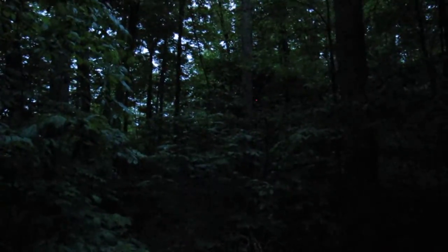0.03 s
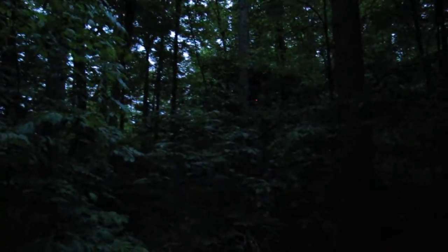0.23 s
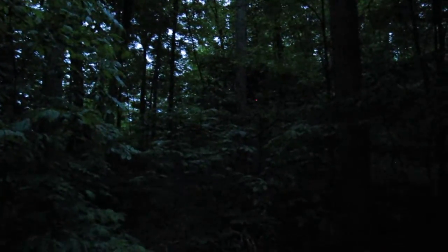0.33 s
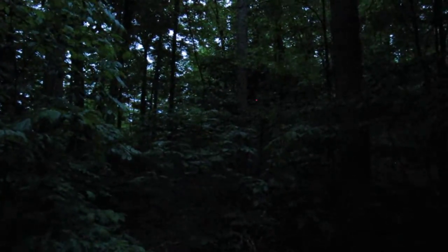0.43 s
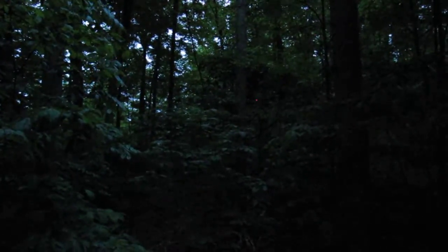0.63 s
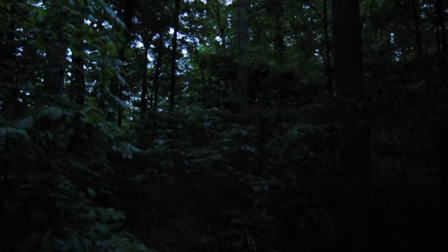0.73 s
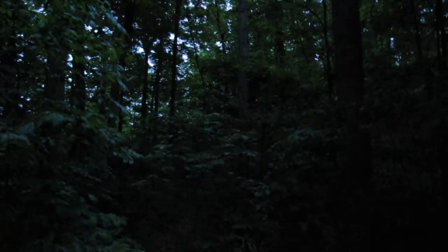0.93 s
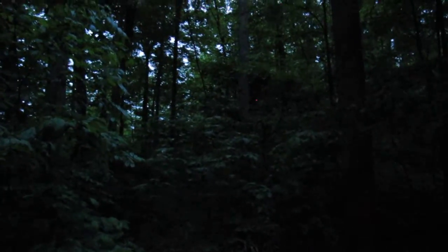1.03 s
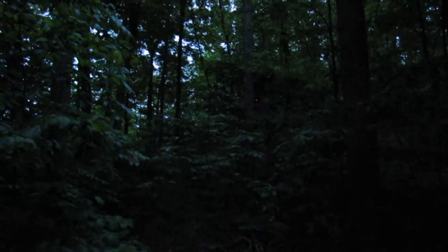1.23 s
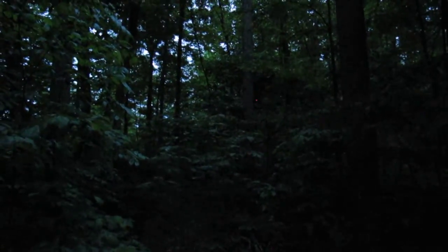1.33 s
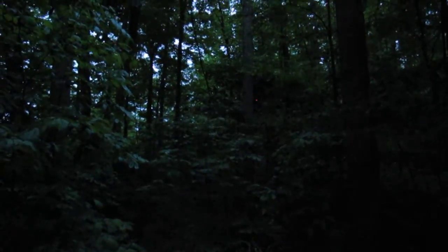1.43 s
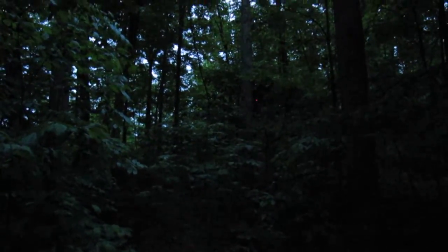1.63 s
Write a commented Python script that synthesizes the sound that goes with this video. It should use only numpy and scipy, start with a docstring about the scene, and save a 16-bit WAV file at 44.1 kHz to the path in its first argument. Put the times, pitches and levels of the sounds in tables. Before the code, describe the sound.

A nightjar whistles two sliding phrases that echo through a dark wood.

```python
"""A faint echo fades in a wood at night, over a low rumble, a soft hiss and a thin steady whine.
Then a nightjar whistles two slurred phrases; the trunks scatter each into a long echo.
Drops strike nearby leaves, which ring for an instant under a bright splash,
and near the end faint birds answer from far away with short, rough whistles."""
import sys
import numpy as np
from scipy import signal
from scipy.fft import rfft, irfft
from scipy.io import wavfile
from scipy.ndimage import uniform_filter1d

SR = 44100
rng = np.random.default_rng(int(sys.argv[2]) if len(sys.argv) > 2 else 0)


def file_out(sig):
    """Save sig as 16-bit WAV at sys.argv[1]."""
    # one column per channel
    cols = np.atleast_2d(sig).T
    # limit, then scale
    lim = np.clip(cols, -1, 1)
    pcm = np.round(lim * 32767).astype(np.int16)
    wavfile.write(sys.argv[1], SR, pcm)


N = 74970
T = np.arange(N) / SR
WOOD_T60_S = 1.37  # time for the long echo among the trunks to fall 60 dB


def undb(db):
    """Amplitude ratio: tenfold for every 20 dB."""
    return 10 ** (np.asarray(db) / 20)


def shaped(gain):
    """Spectral shaping: white noise weighted by gain(hz), scaled to rms 1."""
    hz = np.maximum(np.fft.rfftfreq(N, 1 / SR), 1)
    noise = irfft(rfft(rng.standard_normal(N)) * gain(hz), N)
    return noise / np.std(noise)


def coloured(points):
    """Coloured noise: its spectrum joins (frequency_hz, relative_db) points over log frequency."""
    hz, db = np.array(points).T
    return shaped(lambda f: undb(np.interp(np.log(f), np.log(hz), db)))


def band(centre_hz, width_hz):
    """Band-limited noise under a Gaussian curve; centred on 0 Hz it is a random waver."""
    return shaped(lambda f: np.exp(-.5 * ((f - centre_hz) / width_hz) ** 2))


def smooth(x, seconds):
    """A moving average acts as a low-pass, rounding corners."""
    return uniform_filter1d(x, max(int(seconds * SR), 1), mode="nearest")


def wavering_phase(pitch_hz, depth, rate_hz):
    """Random frequency modulation: phase is the integral of a pitch that wavers by an rms fraction."""
    wavering_hz = pitch_hz * (1 + depth * band(0, rate_hz))
    return 2 * np.pi * np.cumsum(wavering_hz) / SR


def echo(x, t60_s, build_s=0.0013):
    """Diffuse reverberation: countless returns from trunks and leaves build up, then decay."""
    response = rng.standard_normal(N) * undb(-60 * T / t60_s) * (1 - np.exp(-T / build_s))
    return signal.fftconvolve(x, response / np.linalg.norm(response))[:N]


def night_air():
    """Superposition of steady sounds: broadband rumble and hiss, and a narrowband whine."""
    # spectrum of the rumble: frequency_hz, relative_db
    rumble_spectrum = [(15, -3), (28, -3), (38, -15), (52, 5.5), (72, -17), (92, -4.5), (108, -2),
                       (125, -4.5), (170, -7), (240, -13.5), (380, -16), (600, -20), (900, -24.5),
                       (1600, -72)]
    # spectrum of the hiss: frequency_hz, relative_db
    hiss_spectrum = [(400, -3.5), (900, 1.5), (1150, 2.5), (1350, 7), (1700, 1.5), (2300, 0), (2900, -1.5),
                     (3700, -4.5), (4500, 3), (5200, 1), (5700, -9.5), (8500, -7.5), (11500, -11.5),
                     (13500, -18), (15800, -22)]
    # thin high tones: pitch_hz, rms_level_db
    whine_tones = [(7870, -70), (7876, -84), (5350, -77.5)]
    whine = undb(-86) * band(7790, width_hz=57)  # faint halo just below the highest tones
    for pitch_hz, rms_level_db in whine_tones:
        phase = wavering_phase(pitch_hz, depth=0.00096, rate_hz=21)
        whine += undb(rms_level_db) * np.sqrt(2) * np.sin(phase)
    rumble = undb(-52.5) * coloured(rumble_spectrum)
    hiss = undb(-57.5) * coloured(hiss_spectrum)
    return rumble + hiss + whine


def fading_echo():
    """Exponential decay: noise in the song's band, the echo of an earlier phrase among the trees."""
    # spectrum of the echo: frequency_hz, relative_db
    echo_spectrum = [(1100, -59), (1450, -9), (1900, 5.5), (2300, -1), (2650, -40)]
    return undb(-56) * coloured(echo_spectrum) * undb(-60 * T / WOOD_T60_S)


def far_birds():
    """Faint gliding whistles from deep in the wood, roughened by fast frequency modulation."""
    # distant calls: start_s, length_s, start_hz, end_hz, level_db
    far_calls = [(1.454, 0.032, 1350, 968, -52.5), (1.48, 0.15, 2950, 2914, -58),
                 (1.525, 0.03, 1065, 960, -56), (1.586, 0.029, 960, 893, -54),
                 (1.623, .025, 2420, 2310, -56), (1.635, 0.024, 1015, 1060, -49),
                 (1.674, 0.023, 1000, 960, -51.5)]
    calls = np.zeros(N)
    for start_s, length_s, start_hz, end_hz, level_db in far_calls:
        progress = np.clip((T - start_s) / length_s, 0, 1)
        glide_hz = start_hz + (end_hz - start_hz) * progress
        phase = wavering_phase(glide_hz, depth=.035, rate_hz=110)
        calls += undb(level_db) * np.sin(np.pi * progress) * np.sin(phase)
    return calls + undb(-5) * echo(calls, t60_s=.3)


def leaf_drops():
    """Impact excitation: each drop gives a heavily damped leaf resonance and a bright splash."""
    # drops on leaves: start_s, level_db, ring_hz, decay_s, splash_relative_db, cutoff_hz
    impacts = [(0.233, -39.5, 2380, 0.0011, -2.5, 8540), (.3935, -32, 2590, 0.0015, -15, 11800),
               (0.8848, -45.5, 2400, 0.00077, 6.5, 10500), (1.3238, -48, 4000, 0.00046, 15, 12400),
               (1.4453, -36.5, 2600, 0.00093, -1.5, 8440)]
    # spectrum of the splash: frequency_hz, relative_db
    splash_spectrum = [(300, -18), (1500, -6), (4800, 4), (6500, -1), (8700, 4.5), (11500, 1.5),
                       (14000, -33)]
    ring_width_octaves = 0.36
    ticks = np.zeros(N)
    for start_s, level_db, ring_hz, decay_s, splash_relative_db, cutoff_hz in impacts:
        envelope = (T >= start_s) * np.exp(-np.maximum(T - start_s, 0) / decay_s)
        ring = band(ring_hz, ring_hz * ring_width_octaves * np.log(2))
        splash = undb(splash_relative_db) * coloured(splash_spectrum)
        lowpass = signal.butter(6, cutoff_hz, fs=SR, output="sos")
        ticks += signal.sosfilt(lowpass, undb(level_db) * envelope * (ring + splash))
    return ticks + undb(-6.5) * echo(ticks, t60_s=0.19)


def trunk_scattering(song):
    """Scattering: high tones return from the trunks; longer waves pass with little echo."""
    scatter_from_hz = 1260
    highpass = signal.butter(4, scatter_from_hz, "highpass", fs=SR, output="sos")
    scattered = signal.sosfilt(highpass, song)
    first_returns = undb(-4) * echo(scattered, t60_s=0.41)
    tail = undb(-6.5) * echo(scattered, WOOD_T60_S, build_s=0.018)
    return first_returns + tail


def nightjar():
    """A sliding, nearly pure tone with weak harmonics, heard as direct plus scattered sound."""
    # whistled notes, one contour each: time_s, pitch_hz, relative_db
    notes = [
        [(.203, 1230, -58), (.228, 1273, -49), (.248, 1420, -37.5), (.257, 1634, -33.5), (.266, 1952, -32.5),
         (.279, 2395, -35), (.286, 2398, -39), (.296, 1928, -39), (.304, 1700, -41)],
        [(.311, 1239, -52), (.326, 1364, -43), (.336, 1588, -33.5), (.346, 1788, -35), (.361, 1762, -34),
         (.378, 1564, -31), (.406, 1568, -31), (.420, 1464, -41), (.435, 1300, -48.5)],
        [(.571, 1213, -55), (.598, 1371, -40.5), (.620, 1506, -36), (.635, 1898, -28), (.650, 2370, -33.5),
         (.658, 2419, -34.5), (.666, 2215, -35), (.674, 1768, -33.5), (.681, 1410, -43)],
        [(.684, 1380, -40.5), (.692, 1551, -32.5), (.701, 1958, -33.5), (.710, 2162, -39.5),
         (.720, 1872, -33.5), (.730, 1367, -38), (.756, 1366, -36), (.770, 1245, -46.5), (.786, 1094, -38),
         (.806, 1059, -48), (.838, 1020, -48.5)],
    ]
    slur_s, edge_s, song_gain_db = 0.0058, 0.0044, 1
    waver_depth, waver_rate_hz = 0.0032, 105
    third_from_hz, third_spread_hz = 1820, 70  # the third harmonic comes in on the high parts
    whistle, overtones = np.zeros(N), np.zeros(N)
    for note in notes:
        time_s, pitch_hz, relative_db = np.array(note).T
        glide_hz = smooth(np.interp(T, time_s, pitch_hz), slur_s)
        glide_hz *= 1 + waver_depth * band(0, waver_rate_hz)
        phase = 2 * np.pi * np.cumsum(glide_hz) / SR
        sounding = 1. * ((T > time_s[0]) & (T < time_s[-1]))
        gate = smooth(smooth(sounding, edge_s), edge_s)
        envelope = gate * undb(np.interp(T, time_s, relative_db) + song_gain_db)
        third_share = .5 + .5 * np.tanh((glide_hz - third_from_hz) / third_spread_hz)
        second = undb(-33.5) * np.sin(2 * phase)
        third = third_share * undb(-21.5) * np.sin(3 * phase)
        whistle += envelope * np.sin(phase)
        overtones += envelope * (second + third)
    direct = whistle + undb(-10) * overtones  # overtones arrive mostly by way of the trees
    return direct + trunk_scattering(whistle + overtones)


def scene():
    """Superposition: the pressures of all sources add at one spot in the wood."""
    return (night_air() + fading_echo() + far_birds() + leaf_drops() + nightjar())[None]


def record(dry):
    """Band limiting: a steep elliptic low-pass removes the highest treble."""
    cutoff_hz = 15800
    return signal.sosfilt(signal.ellip(10, .2, 70, cutoff_hz, fs=SR, output="sos"), dry)


dry = scene()
out = record(dry)
file_out(out)
```